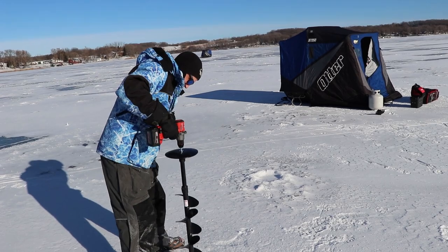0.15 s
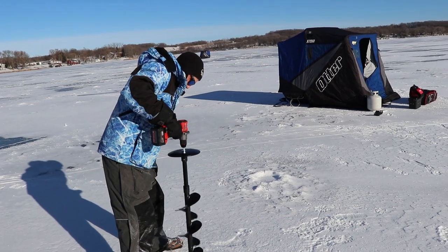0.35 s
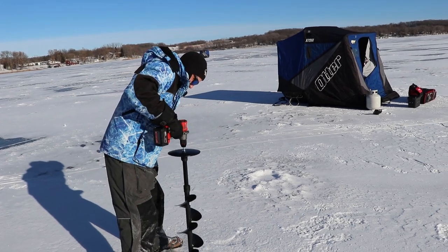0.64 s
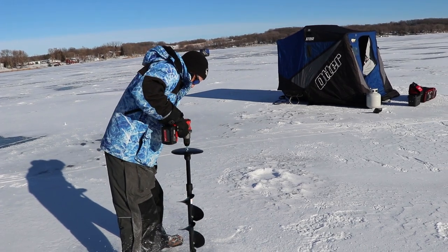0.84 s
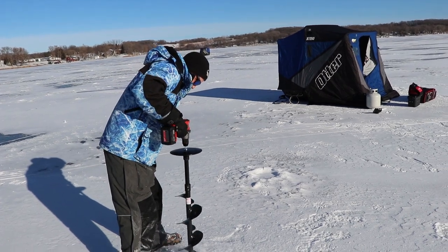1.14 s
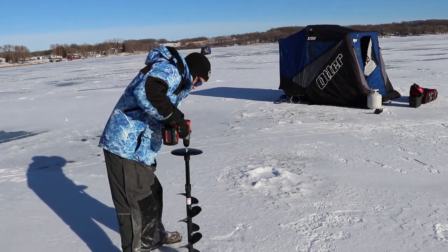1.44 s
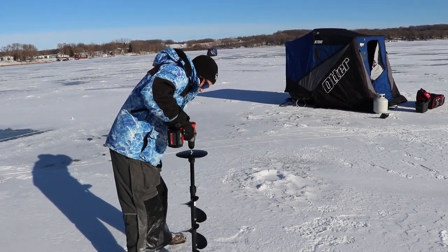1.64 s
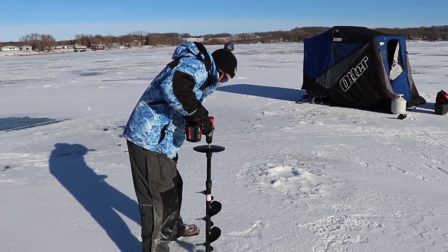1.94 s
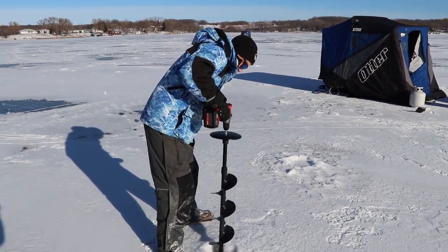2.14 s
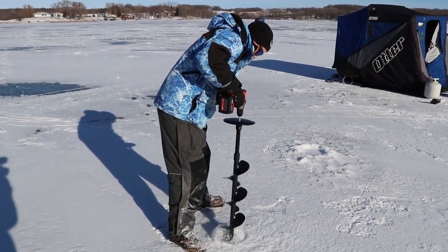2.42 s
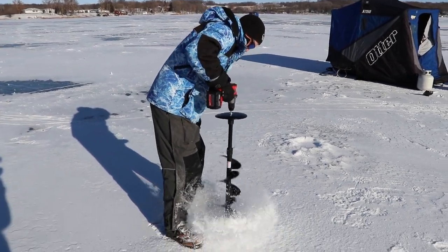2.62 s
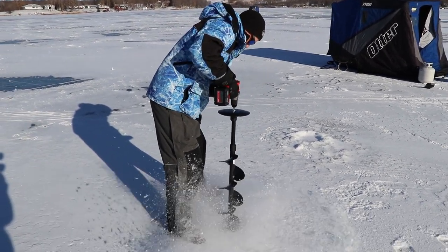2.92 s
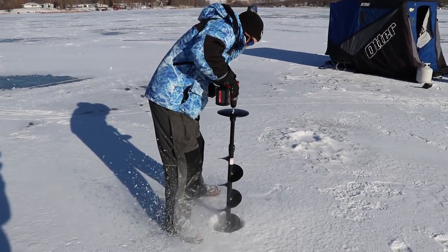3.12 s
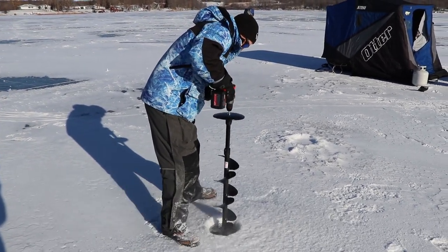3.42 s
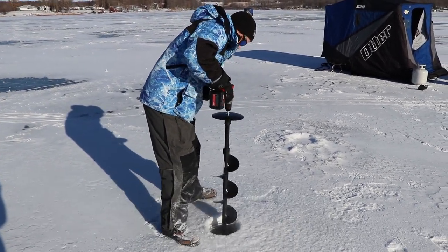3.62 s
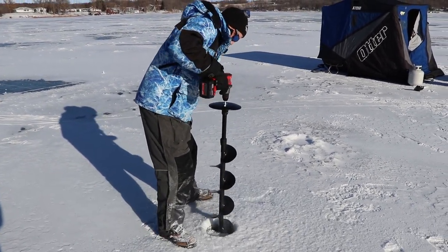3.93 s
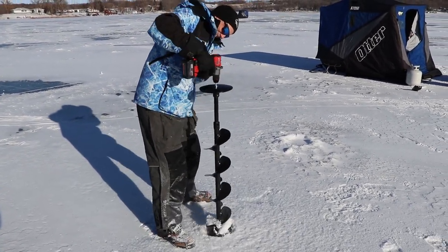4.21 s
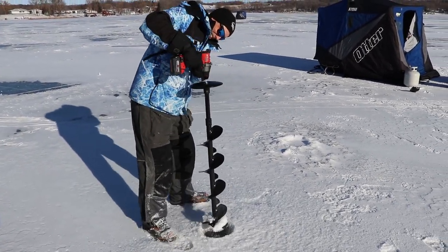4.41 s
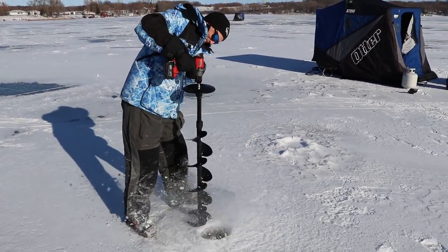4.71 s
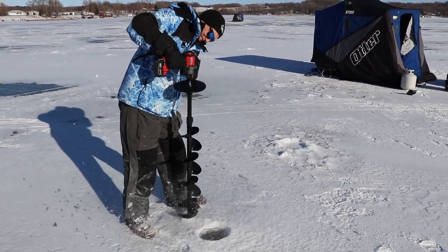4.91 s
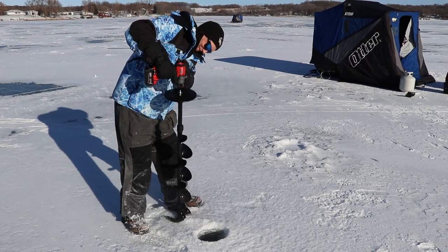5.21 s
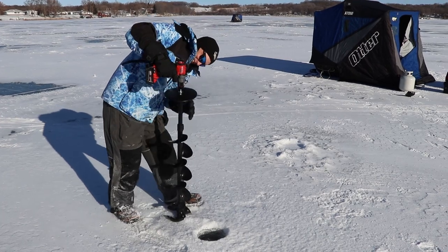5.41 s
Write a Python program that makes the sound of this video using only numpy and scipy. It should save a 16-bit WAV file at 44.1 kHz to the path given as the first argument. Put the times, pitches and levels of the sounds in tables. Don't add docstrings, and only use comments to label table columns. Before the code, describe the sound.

A cordless drill whines up and its auger blades scrape and crunch loudly through lake ice, skip to a stop, then spin briefly again before boots crunch.

```python
import sys
import numpy as np
from scipy import signal
from scipy.fft import rfft, irfft
from scipy.io import wavfile
from scipy.ndimage import uniform_filter1d

SR = 44100
rng = np.random.default_rng(int(sys.argv[2]) if len(sys.argv) > 2 else 0)


def undo_db(level):
    steps = np.asarray(level, float) / 20
    return 10 ** steps


def dump_mix(stems):
    frames = np.atleast_2d(stems).T
    limited = np.clip(frames, -1, 1)
    pcm = np.round(limited * 32767).astype(np.int16)
    wavfile.write(sys.argv[1], SR, pcm)


N = 245028


def seconds():
    return np.arange(N) / SR


def column(table, k):
    rows = np.array(table, float)
    return np.interp(seconds(), rows[:, 0], rows[:, k])


def colour(x, points):
    hz, db = np.array(points, float).T
    f = np.log(np.maximum(np.fft.rfftfreq(4096, 1 / SR), 5))
    outside = np.maximum(np.log(hz[0]) - f, 0) + np.maximum(f - np.log(hz[-1]), 0)
    gain_db = np.interp(f, np.log(hz), db) - 30 * outside
    cepstrum = irfft(np.maximum(gain_db, -90) * np.log(10) / 20)
    cepstrum[1:2048] *= 2
    cepstrum[2049:] = 0
    y = signal.fftconvolve(x, irfft(np.exp(rfft(cepstrum))))[:N]
    return y / np.sqrt(np.mean(y ** 2))


def walk(rate_hz):
    k = max(int(SR / rate_hz), 20)
    held = rng.standard_normal(N // 20 + 1)[np.arange(N) // k]
    return 1.28 * uniform_filter1d(uniform_filter1d(held, k), k)


def bumps(rows, size):
    return sum(size(db) * np.exp(-((seconds() - s) / half) ** 2) for s, db, half in rows)


def bursts(rows):
    out, t = np.zeros(N + SR), np.arange(SR // 2) / SR
    for s, db, length in rows:
        u = t / length
        i = max(int((s - .003) * SR), 0)
        swell = np.clip(u / 0.22, 0, 1) ** 2
        out[i:i + len(t)] += undo_db(db - 6.0) ** 2 * swell * np.exp(-(u / 0.86) ** 4.55 * 2)
    return out[:N]


def chips(rate_hz, spread_db, dust):
    when, size = rng.random(N), rng.exponential(size=N)
    sign, bed = rng.standard_normal(N), rng.standard_normal(N)
    x = (when < rate_hz / SR) * sign * undo_db(np.minimum(spread_db * size, 9))
    return x / x.std() + dust * bed


def rings(events, rise, twin, snap):
    out, t = np.zeros(N + SR), np.arange(SR // 10) / SR
    chance = rng.random((len(events), 3))
    for (s, db, hz, t60), (a, b, c) in zip(events, chance):
        ring = np.sin(2 * np.pi * hz * t)
        ring += twin * np.sin(2 * np.pi * (hz * (1.19 + .5 * a) * t + b))
        ring *= np.exp(-np.log(1000) * t / max(t60, .003))
        ring += snap * np.sin(2 * np.pi * hz * (0.87 + c) * t) * np.exp(-t * hz * 2.7)
        i = int(s * SR)
        out[i:i + len(t)] += undo_db(db) * ring * (1 - np.exp(-t / rise))
    return out[:N]


def fade(table, fade_s):
    t = seconds()
    return np.clip(np.minimum(t - table[0][0], table[-1][0] - t) / fade_s, 0, 1)


def tone(table, multiples, rough, width_hz):
    turn = 2 * np.pi * np.cumsum(column(table, 1) * (1 + 0.004 * walk(70))) / SR
    rough = np.clip(rough, 0, 1)
    out = 0
    for k, m in enumerate(multiples):
        smear = walk(width_hz) + 1j * walk(width_hz)
        shake = np.sqrt(2 * (1 - rough)) + np.sqrt(rough) * smear
        out = out + undo_db(column(table, k + 2)) * np.imag(shake * np.exp(1j * m * turn))
    return fade(table, 0.039) * out


# pitch_hz, density_db
WIND_COLOUR = [(12, -52), (20, -9), (70, -4.5), (125, -9.5), (170, -10.5), (220, -9.5), (370, -120)]
# start_s, peak_db, half_length_s
GUSTS_ON_MIC = [(.05, -33.5, 0.097), (.42, -35, 0.26), (1.0, -50, 0.073), (2.0, -53, .1),
                (2.98, -52, 0.033), (1.3, -52, 0.55), (2.46, -50, 0.13), (3.33, -34, 0.034),
                (3.64, -48, 0.062), (4.25, -51, 0.1), (4.68, -48, 0.041), (4.9, -41, 0.029),
                (5.3, -42, 0.19), (5.55, -44, 0.029)]


def wind():
    calm_db = -53.5
    level = (undo_db(calm_db) + bumps(GUSTS_ON_MIC, undo_db)) * undo_db(1.1 * walk(4.3))
    return colour(rng.standard_normal(N), WIND_COLOUR) * level


def mic_hiss():
    return undo_db(-64) * rng.standard_normal(N)


# start_s, pitch_hz, level_db
MOTOR_HUM = [
    [(1.2, 93.4, -44), (1.5, 96.7, -43.5), (2.0, 90.6, -54), (2.35, 89, -50), (2.65, 70, -55)],
    [(.95, 212.5, -39), (1.6, 224, -41), (2.15, 208.5, -38)],
    [(2.89, 249, -36), (2.98, 265.3, -24.5), (3.08, 274, -36)],
]


def motor_hum():
    return sum(tone(h, [1], rough=0.8, width_hz=h[0][1] / 4) for h in MOTOR_HUM)


# pitch_hz, density_db
PATTER_COLOUR = [(3000, 2.5), (6000, -7), (11500, -6), (15500, -10)]


def settling():
    start_s, start_db, rise_s, fall_db_per_s = 4.73, -37, 0.16, 18.5
    age = np.maximum(seconds() - start_s, 0)
    fall = undo_db(start_db - fall_db_per_s * age + 1.6 * walk(9.9))
    return colour(chips(3000, 3.1, 0.36), PATTER_COLOUR) * fall * (1 - np.exp(-(age / rise_s) ** 2))


def cut_bass(x):
    return signal.sosfilt(signal.butter(2, 290, "high", fs=SR, output="sos"), x)


# start_s, peak_db, ring_hz, t60_s
BOOT_CRACKS = [(4.881, -9.5, 820, 0.01), (4.845, -27, 950, .03), (4.866, -22, 850, .02),
               (4.9122, -15, 1040, 0.017), (4.919, -25, 900, .03), (4.934, -10, 1000, 0.007),
               (4.9412, -11.5, 420, 0.013), (4.961, -6.5, 960, 0.013), (5.006, -22, 750, .015),
               (5.014, -28, 800, .012), (5.08, -17, 800, 0.022), (4.996, -17.5, 790, 0.026),
               (5.029, -13, 1590, 0.015), (5.036, -0.5, 1660, 0.0087), (5.06, -9, 775, 0.016),
               (5.048, 4, 815, 0.011), (5.088, -10, 855, 0.024), (5.107, -11, 795, .014),
               (5.121, -4.5, 755, 0.014), (5.204, -12, 900, 0.018), (5.335, -25, 950, .01),
               (5.378, -7, 705, 0.015), (5.393, -18, 750, 0.01), (5.41, -5, 800, .014),
               (5.423, -17, 800, 0.013), (5.456, -8, 746, 0.011), (5.479, 3, 786, .012),
               (5.1448, -3, 960, 0.015), (5.16, -8, 780, 0.012), (5.175, -6, 850, 0.018),
               (5.2153, 4, 927, 0.022), (5.22, 1, 810, 0.011), (5.23, -2.5, 940, 0.018),
               (5.287, -21, 840, 0.019), (5.347, 5, 1130, 0.0075), (5.361, -18, 686, 0.019),
               (5.434, -1, 700, 0.0073), (5.472, -7, 775, 0.0072), (5.477, -10, 940, 0.031),
               (5.492, 6, 740, 0.013), (5.538, 5, 800, 0.003)]


def boots():
    return cut_bass(rings(BOOT_CRACKS, rise=0.00039, twin=0.25, snap=0.37))


def crumbs(db, hz, t60):
    first_s, last_s, count, spread_db = 4.84, 5.5, 30, 2.5
    when, size, pitch = rng.random((count, 3)).T
    s = first_s + (last_s - first_s) * when
    level_db = db - spread_db * np.log(size + 0.055)
    events = list(zip(s, level_db, hz * 2 ** (1.2 * (pitch - .5)), t60 + 0 * s))
    return rings(events, rise=0.0001, twin=0.76, snap=0)


# start_s, peak_db, ring_hz, t60_s
CHUCK_PINGS = [
    (4.387, -34, 7300, .02),
    (4.387, -31, 10900, 0.018),
    (4.322, -38, 6500, .015),
    (4.419, -38, 11800, .012),
    (4.548, -31.5, 8800, .015),
    (5.132, -26, 5270, .01),
    (5.3525, -19, 6200, 0.013),
]


def chuck():
    return rings(CHUCK_PINGS, rise=0.00037, twin=0.26, snap=0)


# start_s, peak_db, ring_hz
STEEL_TICKS = [(.4014, -2.5, 3000), (0.492, -5, 3350), (.5044, -22, 2940), (0.568, -11, 3020),
               (4.388, -22, 3100), (4.566, -24, 2740), (5.0373, -14, 2920), (5.0503, -15, 3730),
               (5.0943, -24, 2870), (5.2647, -16, 3280), (5.3194, -28, 3250), (5.3383, -23, 3800),
               (5.3424, -16, 4650), (5.3522, -10.5, 3710), (5.416, -26, 3260)]


def steel_ticks():
    t60_s = 0.0078
    return cut_bass(rings([(*k, t60_s) for k in STEEL_TICKS], rise=0.00012, twin=0.23, snap=0.79))


# start_s, mesh_hz, level_db
GEAR_SPEED = [
    (0.3, 872, -45),
    (0.371, 1110, -33),
    (.42, 1357, -31),
    (0.461, 1537, -29),
    (.5, 1690, -28),
    (0.539, 1783, -27),
    (.59, 1825, -27),
    (.63, 1800, -31),
    (.69, 1740, -38),
]
# multiple, level_db
MESH_ORDERS = [
    (1, 1),
    (1.6, -3),
    (2, 1),
    (2.9, -1),
]


def gears():
    case_hz, case_width_hz, case_db = 2920, 300, 8

    def housing_db(hz):
        peak = case_db / (1 + (2 * (hz - case_hz) / case_width_hz) ** 2)
        return peak - np.maximum(hz - 3700, 0) / 25

    s, hz, db = np.array(GEAR_SPEED).T
    t = np.linspace(s[0], s[-1], num=80)
    hz, db = np.interp(t, s, hz), np.interp(t, s, db)
    levels = [db + own_db + housing_db(m * hz) for m, own_db in MESH_ORDERS]
    return tone(np.array([t, hz, *levels]).T, [m for m, _ in MESH_ORDERS], rough=0.12, width_hz=70)


# start_s, pitch_hz, level_db
MOTOR_WHISTLE = [
    (.13, 2920, -18),
    (.19, 2820, -40),
    (.224, 2920, -19.5),
    (.27, 2830, -27),
    (.33, 2860, -28),
    (.38, 3150, -24),
]
# start_s, pitch_hz, level_db
MOTOR_DRONE = [
    [(.95, 343.4, -32.5), (1.15, 365, -39), (1.3, 379.5, -29.5), (1.4, 364, -37)],
    [(1.5, 405, -42), (1.6, 416, -29), (1.68, 417, -38)],
    [(1.55, 284, -36), (1.75, 300, -53), (1.93, 280, -32.5), (2.1, 287, -51), (2.4, 260.6, -40),
     (2.46, 260, -44)],
    [(1.85, 91, -44), (2.05, 92, -45), (2.15, 75.5, -55), (2.35, 93.8, -50), (2.45, 70, -41),
     (2.62, 77.5, -46)],
]
# start_s, pitch_hz, level_db
MOTOR_STREAKS = [
    [(.62, 2850, -27), (.67, 2800, -24), (.72, 2650, -23), (.76, 2400, -24), (.81, 2400, -23),
     (.86, 2650, -27), (.96, 2700, -25), (1.0, 2750, -32)],
    [(.8, 2050, -31), (.87, 1750, -28), (.93, 1650, -24), (1.0, 1600, -33)],
    [(2.54, 2150, -29), (2.6, 2270, -25), (2.66, 2430, -25), (2.71, 2750, -23), (2.75, 2780, -28)],
    [(2.64, 3080, -34), (2.69, 3280, -29), (2.73, 3450, -32)],
    [(2.44, 2450, -31), (2.5, 2570, -24), (2.56, 2740, -26), (2.61, 2980, -31)],
    [(2.77, 2250, -28), (2.82, 2380, -22), (2.86, 2500, -26)],
    [(.54, 4300, -29), (.59, 4280, -29), (.66, 4130, -27)],
    [(4.53, 7950, -51), (4.57, 8050, -48), (4.63, 8400, -49)],
]


def motor():
    out = tone(MOTOR_WHISTLE, [1], rough=0.9, width_hz=260)
    out += sum(tone(s, [1], rough=.65, width_hz=150) for s in MOTOR_STREAKS)
    return out + sum(tone(d, [1], rough=.7, width_hz=35) for d in MOTOR_DRONE)


# start_s, offset_hz, upper_db, lower_db
SIDE_LINES = [
    (.14, 260, -57, -57),
    (.22, 350, -54, -60),
    (.3, 300, -52, -52),
    (.4, 467, -47, -56),
    (.46, 614, -44, -55),
    (0.572, 734, -50, -60),
]


def switching():
    switch_hz = 7945
    turn = 2 * np.pi * np.cumsum(column(SIDE_LINES, 1)) / SR
    out = 0
    for k, way in ((2, 1), (3, -1)):
        level = undo_db(column(SIDE_LINES, k) + 2.5 * walk(40))
        out = out + level * np.sin(2 * np.pi * switch_hz * seconds() + way * turn)
    return np.sqrt(2) * fade(SIDE_LINES, 0.017) * out


# start_s, peak_db, ring_hz, t60_s
TIP_CRACKS = [(0.075, -3, 521.5, 0.082), (0.11, 3, 940, 0.0057), (0.24, -2, 814, 0.088),
              (0.594, -7, 665, 0.031), (.023, -11, 900, .015), (2.656, -3.5, 830, 0.039),
              (2.708, -11, 804, 0.034), (2.752, -3.5, 774, 0.046), (2.8, -16, 860, .03),
              (3.731, -21, 840, 0.0095), (3.529, -20, 840, .02), (3.568, -6, 850, 0.022),
              (3.649, -5, 855, 0.024), (3.829, -19.5, 927, 0.13), (3.872, -20, 894, 0.11),
              (3.959, -23, 540, 0.025), (3.986, -14.5, 870, 0.025), (4.045, -22, 910, 0.0087),
              (4.106, -13.5, 886, 0.023), (4.241, -12, 825, 0.0089), (4.308, -11, 890, 0.0079),
              (4.371, 1, 955, 0.0077), (4.373, -8, 262, 0.021), (4.53, -12.5, 522, 0.067),
              (4.57, -5, 960, 0.0055), (4.704, -4.5, 1030, 0.057)]
# start_s, peak_db
CATCHES = [(1.025, -11), (1.097, -10), (1.262, -3), (1.356, -2), (1.4, -2.5), (1.435, -20), (1.496, -11),
           (1.55, 1), (1.655, 0.5), (1.765, -1.5), (1.825, -26), (1.948, -6), (2.029, -8), (2.086, -2),
           (2.134, -4.5), (2.202, -15), (2.248, -14), (2.289, -19), (2.343, -9), (2.39, 0), (2.445, -2),
           (2.509, -5)]
# start_s, peak_db
DEEP_CATCHES = [
    (2.961, -1),
    (3.007, -3),
    (3.085, -22),
    (3.174, -12),
    (3.214, -22),
    (3.268, -5),
    (3.31, -3),
    (3.419, -27),
    (3.49, -1),
]


def ice_cracks():
    catches = CATCHES + DEEP_CATCHES
    pitch = rng.random(len(catches))
    flakes = [(s, db - 12.5, 900 * 2 ** (p - .5), 0.01) for (s, db), p in zip(catches, pitch)]
    return cut_bass(rings(TIP_CRACKS + flakes, rise=0.00024, twin=0.12, snap=0.13))


# start_s, load_db, edge_db
MAIN_CUT = [(0, -23, -3.5), (.12, -26.5, -12.5), (.28, -26.5, 1), (.55, -20.5, -1), (.69, -23, 8),
            (.9, -22, 6.5), (1.04, -18.5, 3), (1.76, -16.5, -2), (1.96, -18.5, 0), (2.3, -19.5, -4),
            (2.48, -16.5, -1), (2.62, -22, -3), (2.87, -18.5, 1), (2.98, -19, -5.5), (3.33, -16.5, -6),
            (3.49, -17, -2.5), (3.55, -19.5, -32), (3.74, -24.5, -6)]
# start_s, load_db, edge_db
AUGER_LIFT = [
    (3.8, -28, -18),
    (3.97, -35.5, -10.5),
    (4.08, -39.5, -14),
    (4.12, -32, -12),
    (4.21, -29.5, -13),
    (4.35, -43, -2.5),
]
# start_s, load_db, edge_db
CLEARING_SPIN = [
    (4.4, -38, -3),
    (4.43, -30.5, -10),
    (4.47, -26.5, -8.5),
    (4.555, -16.5, -12.5),
    (4.574, -11.5, -11),
    (4.662, -17, 3.5),
    (4.691, -24.5, -2),
    (4.72, -12, 3),
    (4.744, -29, -8),
]
# start_s, load_db, edge_db
BOOT_SHUFFLE = [
    (4.84, -40, -2),
    (4.95, -38.5, 2),
    (4.994, -47.5, 5),
    (5.03, -26.5, -14),
    (5.21, -36, -5),
    (5.27, -38.5, -6),
    (5.37, -24, -11.5),
    (5.478, -16.5, -14.5),
    (5.51, -34, -6.5),
]
# start_s, drop_db, half_length_s
GRIP_SLIPS = [
    (.645, 1, 0.011),
    (1.8, 5, 0.02),
    (2.73, 3, 0.0051),
    (2.785, 3, 0.014),
    (3.155, 8, 0.018),
    (3.26, 4, 0.025),
    (3.38, 3.5, 0.032),
]
# start_s, crunch_peak_db, edge_db, length_s
SINGLE_BITES = [(0.019, -18, 8, 0.037), (0.0655, -5.5, 2, 0.037), (0.109, -7, 2.5, 0.019),
                (0.205, -24, 9, 0.016), (0.232, -14, 8, 0.051), (0.389, -15.5, -7, 0.073),
                (.561, -19.5, 7.5, 0.019), (0.574, -5.5, -7, 0.066), (0.656, -26, 19.5, 0.041),
                (0.685, -14.5, 10, 0.065), (2.639, -9, -9, 0.044), (2.843, -18, 10, 0.05),
                (3.177, -23, -7, 0.01), (3.833, -26, -15, 0.042), (3.985, -19.5, -13.5, 0.031),
                (4.028, -23, -15, 0.066), (4.103, -32, -4, 0.017), (4.173, -21, -13.5, 0.025),
                (4.416, -20, -11, 0.034), (4.562, -15, -0.5, 0.019), (4.578, -16, -10, 0.014),
                (4.683, -13, 3.5, 0.011), (4.706, -16, 13, 0.017), (4.716, -7.5, 13.5, 0.01),
                (5.261, -12.5, -12.5, 0.069), (5.402, -14, -16, 0.037)]
# start_s, period_s, crunch_peak_db, edge_db, length_s
SKIP_RUNS = [
    (2.702, 0.0475, -12.5, 3, 0.026),
]
# start_s, crunch_peak_db, edge_db, length_s
STOPPING_BITES = [
    (3.524, -3, -7.5, 0.035),
    (3.564, -6.5, -4, 0.035),
    (3.603, -7.5, -4.5, 0.033),
    (3.646, -10, -2, 0.03),
    (3.683, -5, -8, 0.032),
    (3.726, -7.5, -4, 0.03),
]
# start_s, peak_db, length_s
POWDER_PUFFS = [(.021, -17.5, 0.042), (.148, -31, 0.022), (.193, -40, .006), (.392, -19, 0.026),
                (.458, -19, 0.014), (.4903, -12, 0.0094), (.502, -17, 0.011), (.518, -18, 0.0056),
                (.586, -12.5, 0.019), (2.55, -25.5, 0.12), (2.705, -27, 0.047), (2.75, -19, 0.032),
                (2.797, -16, 0.052), (4.3, -46, 0.2), (4.4, -47, 0.17), (4.45, -38, 0.087),
                (4.625, -32, 0.12), (4.713, -31, .016), (4.387, -42, 0.01), (4.705, -31, 0.021),
                (5.2645, -23.5, 0.011), (5.35, -28, 0.014), (5.4094, -37, 0.026)]
# start_s, peak_db, length_s
SHEET_THUDS = [(.015, -21, 0.03), (1.62, -24, 0.13), (1.85, -30, 0.26), (2.95, -23, 0.087),
               (3.09, -35, 0.079), (4.42, -24.5, 0.038), (4.568, -32, 0.026), (3.6, -41, 0.13),
               (4.035, -24.5, 0.03), (4.18, -28, 0.076), (4.895, -26, 0.026), (4.93, -33, 0.028),
               (5.015, -23.5, 0.087), (5.212, -18.5, 0.025), (5.345, -16, 0.012), (5.46, -17, 0.048)]


def work():
    stop_s, out_s, seated_s = 3.78, 4.4, 0.97
    t, cut = seconds(), MAIN_CUT + AUGER_LIFT + CLEARING_SPIN + BOOT_SHUFFLE
    load, edge = column(cut, 1) - bumps(GRIP_SLIPS, float), column(cut, 2)
    buried_db = -4 * np.interp(t, [0, stop_s, out_s], [0, 1, 0])
    seated = np.clip((t - seated_s) / 0.097, 0, 1) * np.where(t < out_s, 1, .45)

    runs = [(s + k * gap, db, keen, long) for s, gap, db, keen, long in SKIP_RUNS for k in range(3)]
    nips = [(s, db - 7.5, -4.5, 0.02) for s, db in CATCHES + DEEP_CATCHES]
    s, db, keen, long = np.array(SINGLE_BITES + runs + STOPPING_BITES + nips).T
    crunch, scrape = bursts(zip(s, db, long)), bursts(zip(s, db + keen, long))

    spray_db = load + edge - 9 + buried_db + .35 * np.minimum(edge, 0)
    spray = scrape * undo_db(-9.5 + buried_db / 2) ** 2 + bursts(POWDER_PUFFS)
    open_db, hole_db = -19.5, -15.5
    thump_db = load + open_db + (hole_db - open_db) * seated
    thump = bursts(SHEET_THUDS) + crunch * (seated * undo_db(-14.5)) ** 2
    return [(load, crunch), (load + edge, scrape), (spray_db, spray), (thump_db, thump)]


# pitch_hz, width_hz, level_db
FLIGHT_RIDGES = [
    (1650, 400, -20),
    (2250, 450, -15),
    (2750, 450, -16),
]


def ridges():
    out = 0
    for hz, width_hz, db in FLIGHT_RIDGES:
        turn = 2 * np.pi * np.cumsum(hz * (1 + .04 * walk(14))) / SR
        smear = walk(width_hz) + 1j * walk(width_hz)
        out = out + undo_db(db + 4 * walk(16)) * np.imag(smear * np.exp(1j * turn))
    return out * (seconds() < 3.78)


# start_s, pitch_hz, level_db
SHAFT_RINGS = [
    [(.64, 2350, -35), (.69, 2360, -32), (.76, 2160, -25), (.82, 2220, -36), (.9, 2180, -23),
     (.97, 2170, -26)],
    [(2.39, 2000, -20), (2.44, 2117, -29), (2.53, 2240, -41), (2.57, 2180, -35)],
    [(2.83, 2700, -28), (2.87, 2670, -12), (2.92, 2530, -23)],
    [(2.83, 2190, -30), (2.87, 2150, -19), (2.92, 2070, -20)],
    [(4.57, 2780, -15), (4.625, 2910, -14), (4.66, 2960, -32)],
]
# pitch_hz, density_db
CRUNCH_COLOUR = [(240, -25.5), (400, -19), (452, -11), (659, -4), (723, 1), (850, 4), (1100, -4),
                 (1210, -11.5), (1600, -14.5), (2080, -26), (3520, -120)]
SCRAPE_COLOUR = [(760, -8.5), (1300, -2), (1650, -3), (1800, 0), (2230, 5), (2480, 2.5), (2750, 3),
                 (3780, -10), (4360, -19.5), (6000, -18), (7800, -33), (13200, -120)]
SPRAY_COLOUR = [(2650, -22.5), (4500, -3), (5000, -5.5), (5430, -4.5), (7060, -16.5), (9200, -17),
                (9810, -22.5), (10600, -15.5), (14700, -24), (15700, -37)]
THUMP_COLOUR = [(76, -45.5), (130, -16), (259, 1), (295, 2), (329, -1), (480, -14), (620, -5.5),
                (1060, -120)]


def auger():
    crunch, scrape, spray, thump = work()
    chatter_hz = 70
    turn = 2 * np.pi * np.cumsum(chatter_hz * (1 + 0.0587 * walk(2.3))) / SR
    shared_db = 0.45 * walk(22) + 0.7 * walk(90)
    big, fine, powder = chips(900, 3.2, 1.0), chips(4500, 2.5, 0.81), chips(5000, 0.67, 0.32)
    # chips, colour, work, own flicker dB, chatter dB
    layers = [(big, CRUNCH_COLOUR, crunch, 1.6, .8),
              (fine + 0.044 * big, SCRAPE_COLOUR, scrape, .9, 1.6),
              (powder + 3.3 * fine, SPRAY_COLOUR, spray, 1.2, 2.1)]
    out = colour(big, THUMP_COLOUR) * np.sqrt(undo_db(thump[0]) ** 2 + thump[1]) * undo_db(2.5 * walk(18))
    for x, points, (db, bites), own_db, chatter_db in layers:
        steady = undo_db(db + shared_db + chatter_db * np.sin(turn))
        out += colour(x, points) * np.sqrt(steady ** 2 + bites) * undo_db(own_db * walk(45))
    out += ridges() * np.sqrt(undo_db(scrape[0] + shared_db) ** 2 + scrape[1])
    return out + sum(tone(ring, [1], rough=1.0, width_hz=550) for ring in SHAFT_RINGS) * undo_db(shared_db)


def scene():
    background = wind() + mic_hiss() + motor_hum() + settling()
    crust = boots() + crumbs(-28, 850, 0.009) + crumbs(-40, 5500, 0.003)
    drill = chuck() + steel_ticks() + gears() + motor() + switching()
    return (background + crust + drill + ice_cracks() + auger())[None]


def top_cut(x):
    return signal.sosfilt(signal.butter(12, 15870, fs=SR, output="sos"), x)


def record(dry):
    top_hz = 15850
    steep = signal.ellip(10, .5, 60, top_hz, fs=SR, output="sos")
    mix = signal.sosfilt(steep, np.tanh(dry / 1.364))
    return top_cut(mix)


dry = scene()
out = record(dry)
dump_mix(out)
```